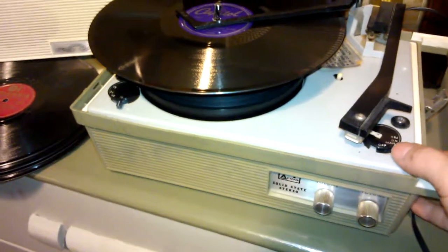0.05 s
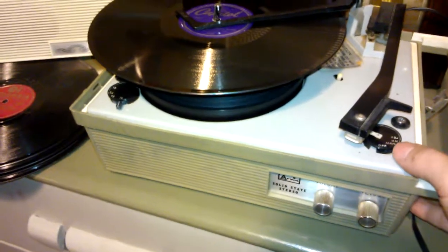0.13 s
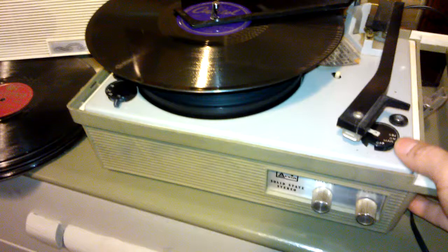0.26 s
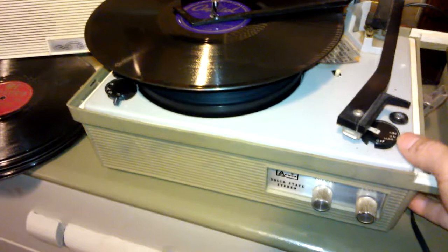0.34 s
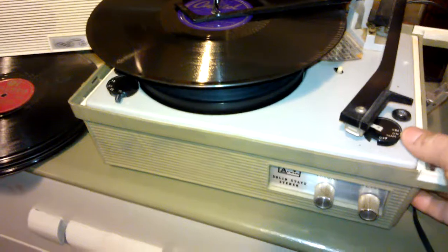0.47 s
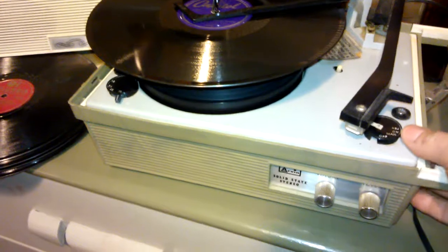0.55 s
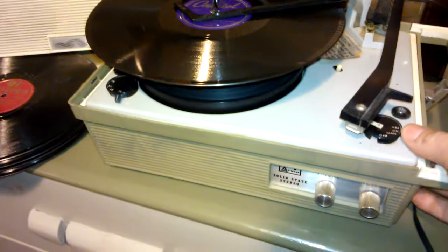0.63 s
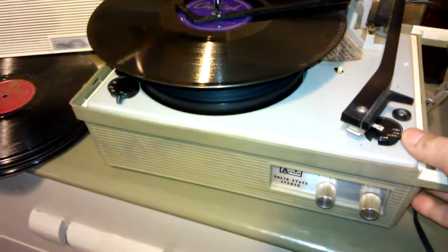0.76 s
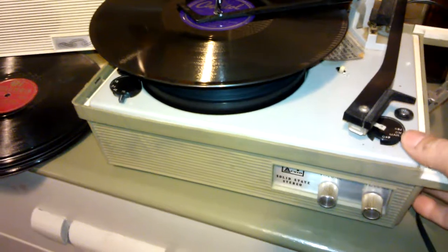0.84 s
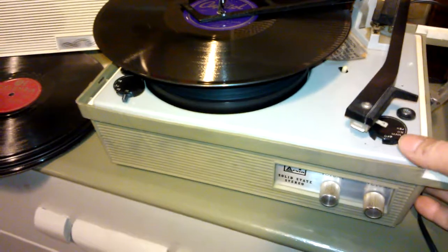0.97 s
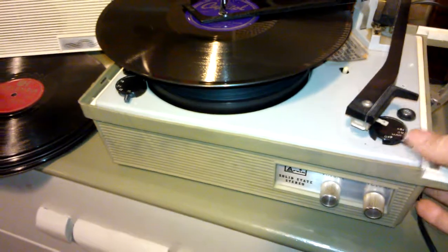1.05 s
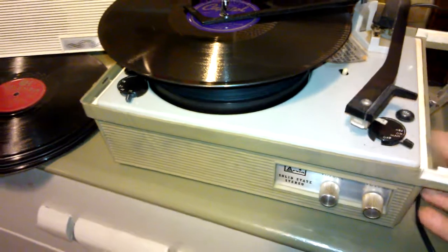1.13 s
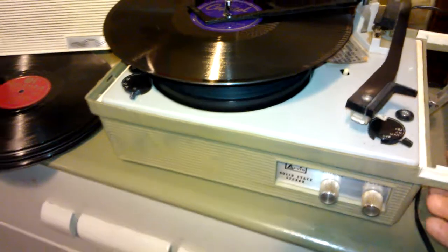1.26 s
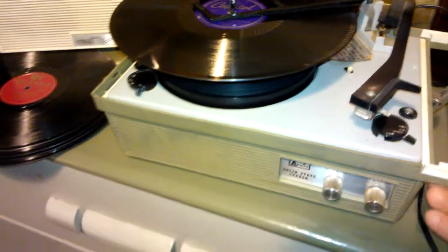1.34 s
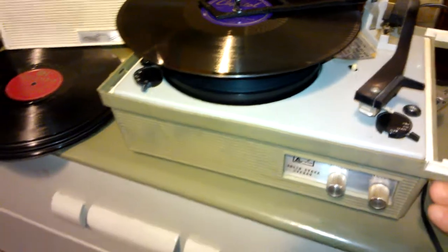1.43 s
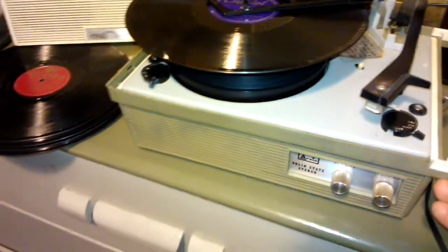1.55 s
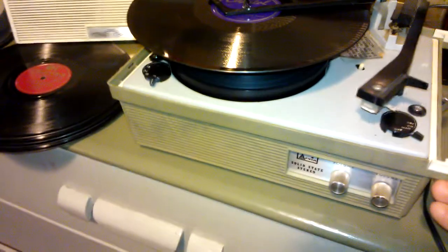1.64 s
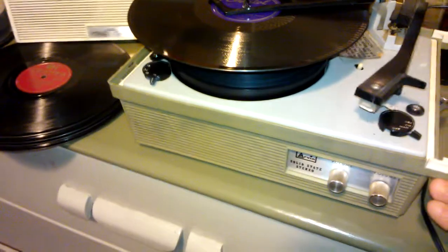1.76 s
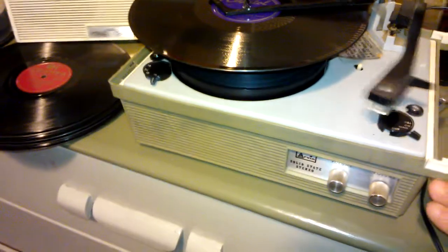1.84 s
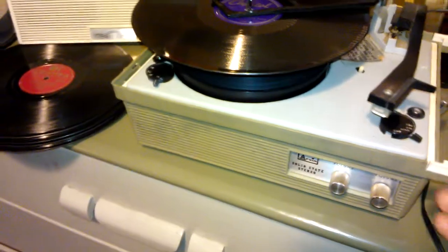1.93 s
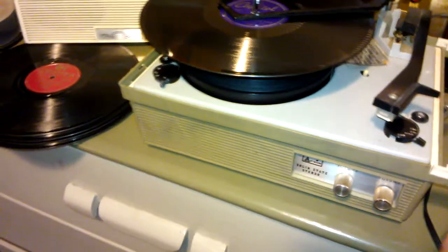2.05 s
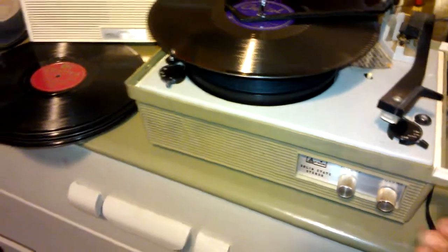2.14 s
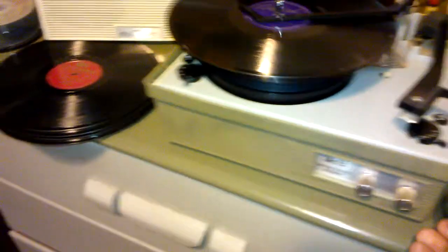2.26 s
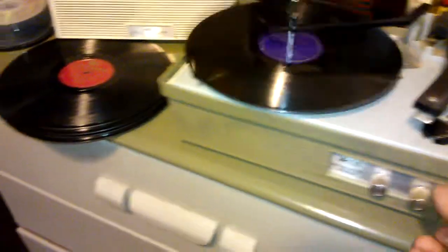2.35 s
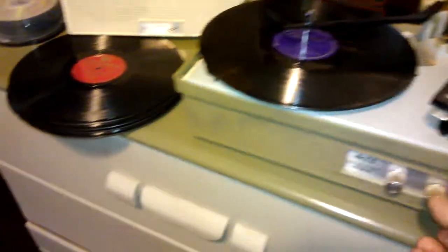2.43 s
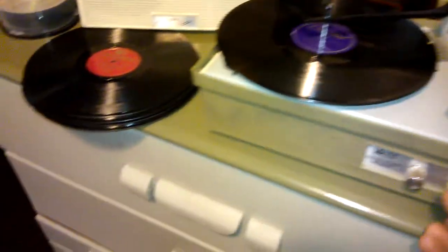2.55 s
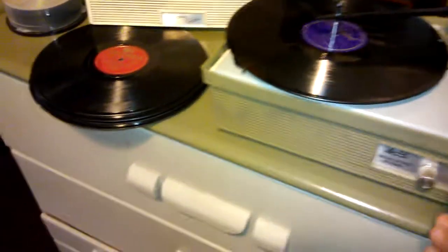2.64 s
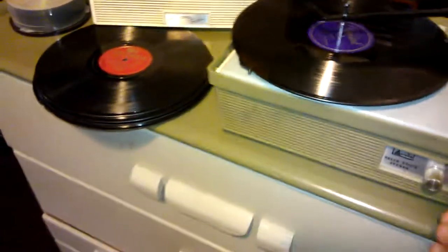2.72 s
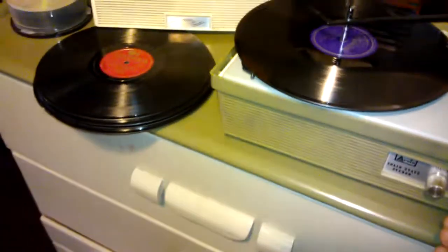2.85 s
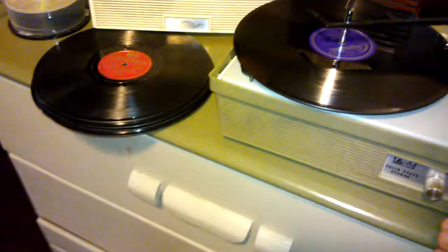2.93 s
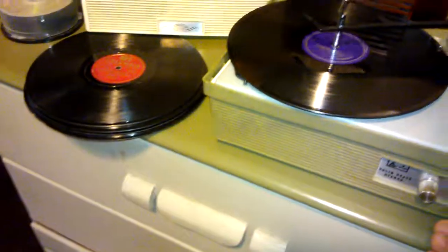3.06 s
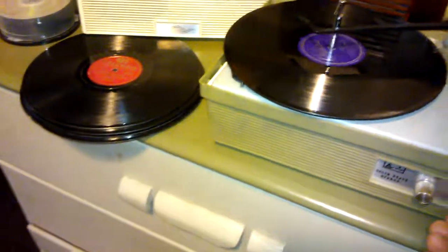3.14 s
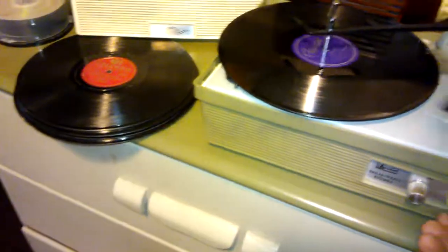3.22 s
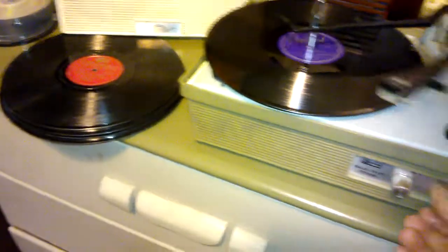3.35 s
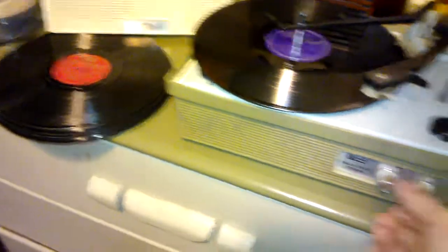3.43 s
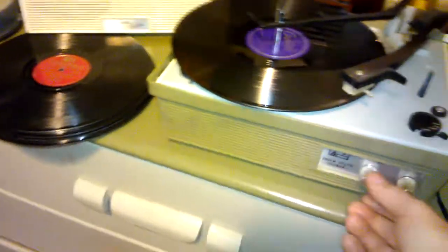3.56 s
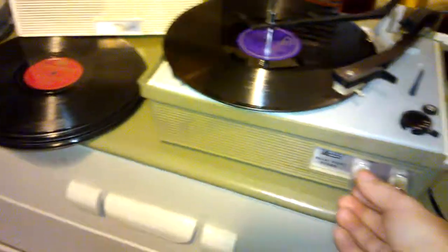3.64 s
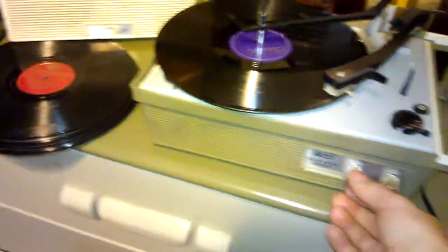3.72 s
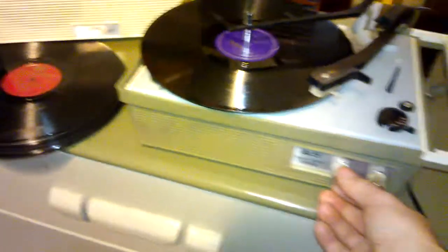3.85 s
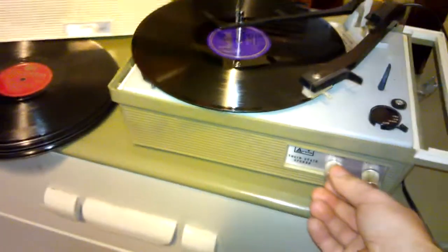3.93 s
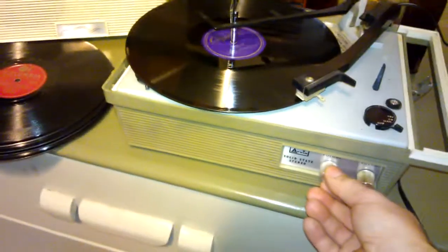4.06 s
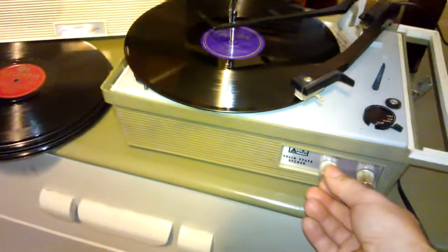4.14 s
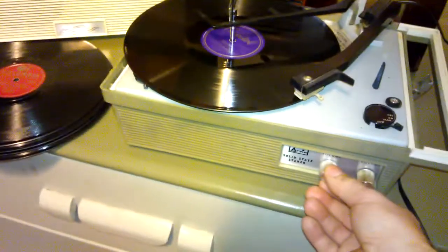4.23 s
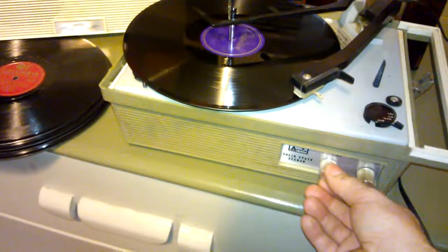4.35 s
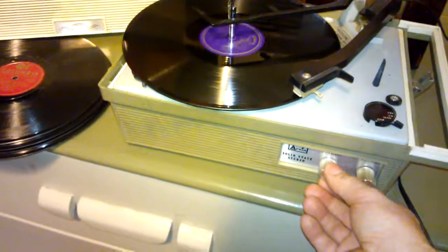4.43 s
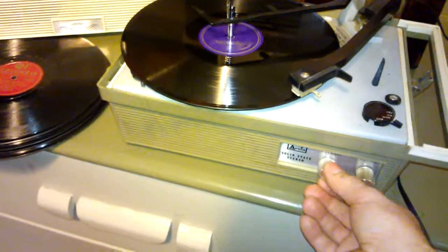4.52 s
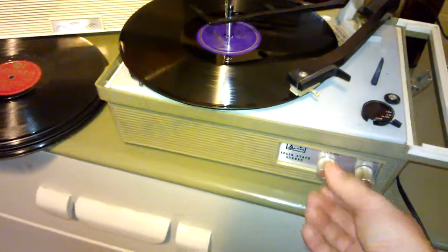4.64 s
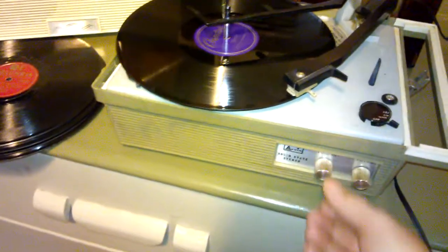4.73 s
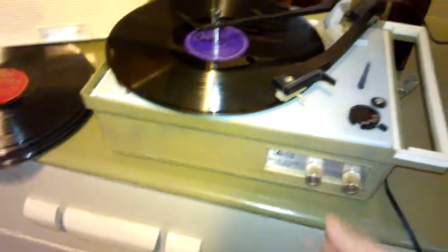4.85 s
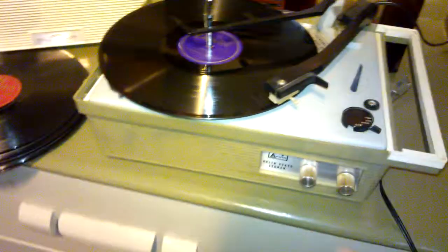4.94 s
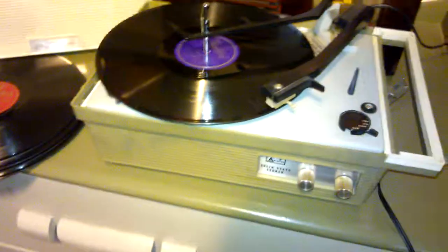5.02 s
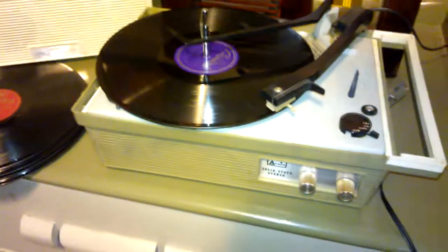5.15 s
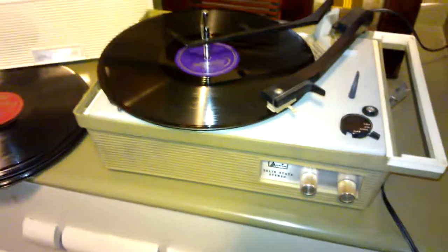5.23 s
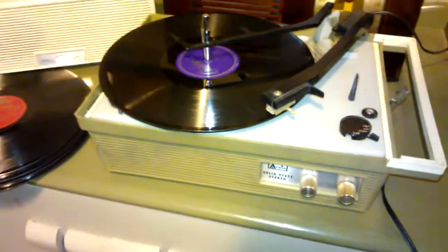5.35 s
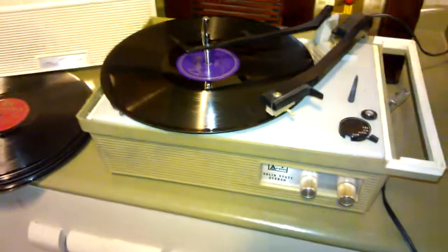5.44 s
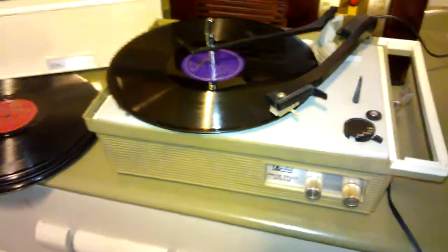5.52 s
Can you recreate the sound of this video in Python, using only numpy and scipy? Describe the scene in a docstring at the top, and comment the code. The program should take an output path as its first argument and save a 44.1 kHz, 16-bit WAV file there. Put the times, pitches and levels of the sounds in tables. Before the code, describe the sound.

A record changer ticks through its cycle, drops a record with a clunk and ends on a ringing clack over a low motor hum.

```python
"""A portable record changer runs through its cycle in a small room, over the hum of its motor.
First the selector is turned, levers tick and a gear grinds as it lifts the arm. At 2.2 s the
spindle latch snaps; a record drops, rocks the platter on its springs and swishes as it slips.
The arm swings in with more clicks, and at about 4 s the stylus lands and hisses in the groove.
Last, at 4.4 s, the mechanism lets go with a ringing clack."""
import sys
import numpy as np
from scipy import signal
from scipy.io import wavfile

SR = 44100
rng = np.random.default_rng(int(sys.argv[2]) if len(sys.argv) > 2 else 0)


def output_pcm(signal):
    """Save a mono or channel-first signal as 16-bit PCM at the path in sys.argv[1].

    Samples are clipped to [-1, 1] before scaling.
    """
    pcm = np.clip(np.atleast_2d(signal).T, -1, 1) * 32767
    wavfile.write(sys.argv[1], SR, np.round(pcm).astype(np.int16))


N = 246254
TIME = np.arange(N) / SR
BRIEF = TIME[:SR // 4]
HIT_SAMPLES = .03 * SR   # a hit has the energy of a steady noise this long at its level
# filters that split sound into bands a third of an octave wide
EDGES = 22 * 2 ** (np.arange(30) / 3)
CENTRES, WIDTHS = np.sqrt(EDGES[1:] * EDGES[:-1]), np.diff(EDGES)
BANK = [signal.butter(2, pair, "band", fs=SR, output="sos") for pair in zip(EDGES, EDGES[1:])]

# A "fade", or t60, is the time a sound takes to fall by 60 dB.
# the falling record's hits: (time [s], level [dB], treble fade [s])
DROP_HITS = [(2.3803, -29, 0.02), (2.400, -32, 0.056), (2.4382, -13.5, 0.047), (2.4469, -23.5, 0.047),
             (2.470, -37.5, 0.058)]
# the fallen record catches up with the platter: (time [s], share of full speed [0-1])
RECORD_SPEED = [(2.45, 0.6), (2.729, 0.49), (2.88, .74), (3.22, 1)]
# the case shifts under strain: (time [s], level [dB], length [s], pitch [Hz])
CASE_SHIFTS = [(0.771, -35.5, 0.0081, 405), (0.798, -47.5, 0.083, 381), (1.777, -55.5, 0.23, 154),
               (2.372, -34, 0.017, 352), (3.534, -40, 0.012, 366), (3.826, -36, 0.01, 345.3),
               (4.06, -46, 0.0478, 363), (4.164, -41.5, 0.036, 234.4), (4.69, -53.5, .03, 152.7)]


def record_drop():
    """The record hits the platter a few times in a row and sets it ringing."""
    # tone colour: (frequency [Hz], relative level [dB])
    colour = [(76, -15), (130, 3), (194, -8.5), (427, -0.5), (589, -27.5), (954, -0.5), (1240, -36.5),
              (1610, -9), (1780, -24), (2270, -5.5), (3260, -3), (5850, -17.5), (9870, -15), (16000, -31)]
    # broad resonances: (pitch [Hz], width [Hz], gain [dB])
    body = [(246, 180, -12.5), (2510, 250, -11), (3420, 390, -17)]
    # ringing tones: (pitch [Hz], relative level [dB], fade [s])
    tones = [(241, -2, 0.47), (306, -7, 0.23), (340.5, 6.5, 0.38), (386, -11, .22), (890, 14, 0.046),
             (1615, -11, 0.165), (2203, 4, 0.32), (2380, 5, 0.29), (2405, 4, 0.4), (2450, 10, 0.18),
             (2770, 0, 0.069), (3288, -10.5, .2), (3800, -5, 0.36), (4560, -1, .2), (6380, -7, .2)]
    cracks = blow(DROP_HITS, colour, body, bright_db=5.0, wet_db=-3.5)
    return cracks + ringing(DROP_HITS, tones, level_db=-31.5)


def release_clack():
    """The mechanism lets go, and its parts strike each other and ring."""
    # hits: (time [s], level [dB], treble fade [s])
    hits = [(4.4035, -34.5, 0.063), (4.4145, -34, 0.02), (4.4178, -13, 0.04), (4.440, -29, 0.14)]
    # tone colour: (frequency [Hz], relative level [dB])
    colour = [(59, -62), (100, -25.5), (166, -21.5), (302, -19), (365, -13), (570, -27.5), (1030, -17.5),
              (1170, -18.5), (1330, -14.5), (2170, -14.5), (2750, -8.5), (4020, -10.5), (7290, -20),
              (12900, -32.5), (16000, -49)]
    # broad resonances: (pitch [Hz], width [Hz], gain [dB])
    body = [(2708, 114, 14), (4640, 264, 1)]
    # ringing tones: (pitch [Hz], relative level [dB], fade [s])
    tones = [(1020, -2, 0.25), (1323, -2.5, 0.17), (2730, -20, 0.29), (2755, 4.5, 0.17),
             (2820, -10.5, 0.22), (3000, 1.5, 0.23), (2930, -9.5, 0.41), (3290, 3.5, 0.26), (4440, -8, .2),
             (4580, -6.5, 0.36), (5130, -9, 0.35), (6400, -24.5, .21), (6720, -19.5, .2), (7070, -15, 0.16),
             (8080, -7, .2)]
    return blow(hits, colour, body, bright_db=10.5, wet_db=-3.5) + ringing(hits, tones, level_db=-25.0)


def latch_snap():
    """The spindle latch snaps: four very quick hits and a faint ring."""
    # hits: (time [s], level [dB], treble fade [s])
    hits = [(2.2035, -46, 0.049), (2.2065, -24.5, 0.032), (2.2092, -20.5, 0.034), (2.2118, -22.5, 0.013)]
    # tone colour: (frequency [Hz], relative level [dB])
    colour = [(71, -61), (120, -7.5), (341, -4.5), (445, -7.5), (483, -5.5), (656, -19.5), (1010, -1.5),
              (1860, -11), (3450, 9.5), (5410, -6.5), (7820, -2), (15000, -6.5), (16000, -19)]
    # broad resonances: (pitch [Hz], width [Hz], gain [dB])
    body = [(796, 80, 2), (1033, 114, -3), (7460, 330, 0.5)]
    # ringing tones: (pitch [Hz], relative level [dB], fade [s])
    tones = [(964, 3.5, 0.36), (3330, -13, 0.38), (4060, -3.5, 0.26), (6940, -24, .3), (8100, -8, .21),
             (8480, -3.5, 0.23), (10030, -17.5, .2)]
    return blow(hits, colour, body, bright_db=4.5, wet_db=-3.0) + ringing(hits, tones, level_db=-42.5)


def spring_bounce():
    """The weight of the record rocks the deck on its springs."""
    # the rocking: (pitch [Hz], relative level [dB], fade [s])
    springs = [(29.5, -19, 0.76), (44, -26, 0.27), (74.6, -12.5, 0.22), (109, -47, 0.18)]
    return low_pass(ringing(DROP_HITS, springs, level_db=-2.5, lag_s=0.0088), hz=160)


def lever_clicks(level_db=-6, own_db=7, steel_db=-9, thud_t60=0.046, click_delay_s=.002):
    """Each lever click shakes the deck, small steel parts and a resonance of its own."""
    # levers, selector and arm:
    # (time [s], relative level [dB], brightness [dB per octave], own pitch [Hz], fade [s])
    clicks = [(0.21, -58, 0.5, 1530, 0.027), (0.411, -56.5, 2.5, 11000, .037),
              (0.458, -52, 5.5, 10800, 0.039), (0.496, -50.5, 4, 3390, .041),
              (0.538, -49.5, -1, 2880, 0.022), (0.581, -35, 1, 2450, 0.015), (0.717, -45.5, -2, 886, 0.059),
              (0.765, -48.5, -2.5, 860, 0.038), (0.809, -51.5, 3.5, 3730, 0.075),
              (0.871, -54, 1.5, 3540, 0.023), (1.0, -37, 4, 4240, 0.047), (1.577, -55.5, -3.5, 1150, 0.011),
              (1.647, -55, 1, 2970, 0.044), (1.939, -46, .5, 2970, 0.074), (2.038, -53, 0.5, 1170, .037),
              (3.21, -52.5, -1.5, 3240, 0.023), (3.35, -59, 7.5, 3530, 0.04),
              (3.46, -45.5, 1.5, 3400, 0.04), (3.517, -46, -0.5, 1680, 0.066),
              (3.803, -44, -2.5, 391, 0.047), (3.915, -67.5, 8.5, 4330, 0.026),
              (3.949, -58.5, 5, 8100, 0.085), (4.045, -44, 8.5, 3250, 0.045), (4.097, -51, -5, 3100, 0.1),
              (4.164, -51.5, -4.5, 850, 0.044), (4.223, -50.5, 3.5, 8600, .04),
              (5.29, -55.5, 0.5, 1910, 0.026)]
    # tone colour of all clicks: (frequency [Hz], relative level [dB])
    colour = [(60, -30), (200, -28.5), (350, -34), (600, -34.5), (1180, -30), (1800, -33), (3700, -31),
              (5800, -41.5), (9000, -37.5), (12000, -43.5), (15000, -55.5)]
    # steel parts: (pitch [Hz], relative level [dB], fade [s])
    steel_tones = [(1072, 5, 0.062), (1240, 8, .12), (2550, -4.5, 0.084), (3450, -1, .16), (3790, -9, .18),
                   (8950, -47, .1), (11100, -1, .09)]
    # resonances of deck and case: (pitch [Hz], width [Hz], gain [dB])
    deck = [(364.6, 29, 14), (1010, 77, 4.5), (2627, 84, 3), (3195, 200, -1.5), (7340, 140, -1.5),
            (8650, 290, -6.5)]
    out = np.zeros(N)
    octaves = lambda hz: np.log2(np.clip(hz, 400, 10800) / 2000)   # brightness tilts about 2000 Hz
    for s, db, tilt_db, own_hz, t60 in clicks:
        band_db = db + per_band(colour) + tilt_db * octaves(CENTRES)
        gains = from_db(band_db) * np.sqrt(WIDTHS * HIT_SAMPLES)
        fades = per_band([(300, thud_t60), (1000, t60)])
        wet_db = -3.5 + 1.3 * np.log2(t60 / thud_t60)   # shorter clicks get less room sound
        click = impact(gains, fades, wet_db)
        own_ring = from_db(own_db) * resonate(click * fade(BRIEF, t60=0.35), own_hz, own_hz / 16)
        steel = [(hz, db + steel_db + tone_db + tilt_db * octaves(hz), ring_s)
                 for hz, tone_db, ring_s in steel_tones]
        add(out, click + own_ring, s + click_delay_s)
        add(out, ring(steel), s + click_delay_s)
    return from_db(level_db) * (out + resonances(out, deck))


def case_booms(sharpness=3.6):
    """The case shifts and booms briefly, each time around one pitch."""
    white = rng.standard_normal(N)
    return sum(swell(s, db, length) * rms_one(resonate_twice(white, hz, hz / sharpness))
               for s, db, length, hz in CASE_SHIFTS)


def case_drone(hz=153.9, gain_db=-4.5, lag_s=0.028, spread_s=0.036):
    """Each shift wakes the lowest tone of the case, which comes later and lasts longer."""
    loudness = np.zeros(N)
    for s, db, length, _ in CASE_SHIFTS:
        longer = length + spread_s
        thinning_db = 10 * np.log10(length / longer)   # the energy is spread over more time
        loudness += swell(s + lag_s, db + gain_db + thinning_db, longer)
    return loudness * np.sin(2 * np.pi * hz * TIME + drift(5))


def record_swish(full_speed_hz=1930, width_hz=140, base_db=-63.5, slip_db=10.5):
    """The slipping record rubs unevenly; its two bands of noise rise and soften as it speeds up."""
    speed, landed = record_speed()
    centre_hz = full_speed_hz * speed * (1 + 0.12 * speed ** 2 * drift(16))
    upper = from_db(-6) * narrow_noise(1.5 * centre_hz, width_hz)
    since_caught_up = np.maximum(TIME - RECORD_SPEED[-1][0], 0)
    settle_db = np.exp(-since_caught_up / 0.14)   # 1 dB louder until the record settles
    uneven_db = 6.0 * speed * drift(22.17)
    level_db = base_db + slip_db * (1 - speed) + uneven_db + settle_db
    return landed * from_db(level_db) * (narrow_noise(centre_hz, width_hz) + upper)


def turning_rubs(turn_s=.168, brush_s=.018, base_db=-57.5, slip_db=13.5):
    """A small part brushes once a turn, slower and louder while the record still slips."""
    # resonances of the rub: (pitch [Hz], width [Hz], gain [dB])
    peaks = [(1540, 470, -7), (2140, 430, -18), (2880, 1000, -4.5)]
    speed, landed = record_speed()
    turns = np.cumsum(speed) / SR / turn_s
    turns -= np.interp(2.765, TIME, turns)   # one brush falls at 2.765 s
    brush = np.exp(-((turns - np.round(turns)) * turn_s / brush_s) ** 2)
    level_db = base_db + slip_db * (1 - speed) + drift(7.1)
    white = rng.standard_normal(N)
    chirp = sum(from_db(db) * resonate_twice(white, hz, width) for hz, width, db in peaks)
    return landed * brush * from_db(level_db) * rms_one(chirp)


def gear_grind(slips_per_s=700):
    """Tiny slips between gear teeth shake the linkage while the cam gear lifts the arm."""
    # loudness of the grinding: (time [s], level [dB])
    levels = [(0, -74), (.4, -64.5), (1.5, -61.5), (1.7, -61.5), (2.15, -57), (2.45, -53), (2.7, -94)]
    # resonances of the linkage: (pitch [Hz], width [Hz], gain [dB])
    linkage = [(850, 40, 4), (1170, 140, -13), (2543, 50, 2), (3260, 140, -0.5), (3730, 510, -6)]
    slips = (rng.random(N) < slips_per_s / SR) * rng.standard_normal(N)
    level_db = np.interp(TIME, *np.transpose(levels))
    return from_db(level_db) * rms_one(resonances(slips + 1e-18, linkage))


def stylus_hiss(lands_s=4.05, flicker_db=2.0):
    """The rough groove makes the stylus hiss in its own resonances, each one flickering."""
    # stylus resonances: (pitch [Hz], width [Hz], level [dB])
    peaks = [(6940, 600, -70.5), (8300, 790, -65), (9460, 510, -69), (10400, 350, -70), (11400, 680, -70),
             (12750, 800, -75)]
    groove = rng.standard_normal(N)
    hiss = sum(from_db(db + flicker_db * drift(42)) * rms_one(resonate_twice(groove, hz, width))
               for hz, width, db in peaks)
    return hiss * (TIME > lands_s)


def motor(whirr_db=-56.5, rumble_db=-54.5):
    """The motor hums, wavering a little, over the whirr and rumble of the drive."""
    # hum tones: (pitch [Hz], level [dB])
    hum_tones = [(59.2, -49.5), (118.4, -68), (156.1, -68), (236.9, -66), (349.9, -66), (893.6, -76)]
    # running mechanism and room: (frequency [Hz], relative level [dB])
    whirr_colour = [(88, -24), (150, 6), (190, -4.5), (235, 13.5), (259, -11.5), (341, 5), (545, -11),
                    (821, -7.5), (2400, -8.5), (2600, -16), (2760, -20), (3100, -11.5), (6020, -21),
                    (14500, -30.5), (16000, -37.5)]
    # rumble of the drive: (frequency [Hz], relative level [dB])
    rumble_colour = [(15, -10), (30, 0), (75, -7.5), (120, -19.5), (300, -37)]
    hum = np.zeros(N)
    for hz, db in hum_tones:
        peak = np.sqrt(2) * from_db(db - 0.5 * drift(7))
        phase = 2 * np.pi * (hz * TIME + rng.random()) + hz / 600 * drift(4)
        hum += peak * np.sin(phase)
    whirr = from_db(whirr_db - 2.5 * drift(17)) * noise(whirr_colour)
    return hum + whirr + from_db(rumble_db) * noise(rumble_colour)


def echoes(x):
    """The lid, worktop and walls each send back a quick, quiet copy."""
    # echoes: (delay [s], gain [dB])
    reflections = [(.0052, -22.5), (.0093, -17), (0.0153, -27), (0.0237, -21)]
    out = x.copy()
    for s, db in reflections:
        add(out, from_db(db) * x, s)
    return out


def blow(hits, colour, body, bright_db, wet_db):
    """A few quick hits, each a crack whose lows last longer, coloured by the struck part."""
    out = np.zeros(N)
    treble_lift = from_db(bright_db * np.log2(np.maximum(CENTRES / 4000, 1)))
    gains = unit(band_gains(colour) * treble_lift)
    for s, db, t60 in hits:
        crack = impact(gains, t60 * (1 + 400 / CENTRES), wet_db)
        add(out, from_db(db) * np.sqrt(HIT_SAMPLES) * crack, s)
    return out + resonances(out, body)


def impact(gains, t60, wet_db, gap_s=.004):
    """A short crack, then the room's tail, whose treble dies first; wet_db turns the tail up or down."""
    # length of the tail: (frequency [Hz], fade [s])
    room_fades = [(100, 0.49), (400, 0.35), (1500, 0.32), (3500, 0.33), (7500, 0.27), (11000, 0.3),
                  (16000, 0.158)]
    # strength of the tail: (frequency [Hz], relative level [dB])
    room_levels = [(100, -3.5), (400, 4.5), (1500, 3), (3500, -1), (7500, 1), (11000, -12), (16000, -40.5)]
    out = banded(gains, BRIEF, t60)
    tail_gains = gains * from_db(per_band(room_levels) + wet_db)
    add(out, banded(tail_gains, BRIEF, per_band(room_fades)), gap_s)
    return out


def ringing(hits, tones, level_db, lag_s=0):
    """The hardest hit of a blow sets the part ringing."""
    out = np.zeros(N)
    hardest_s = max(hits, key=lambda hit: hit[1])[0]
    add(out, from_db(level_db) * ring(tones), hardest_s + lag_s)
    return out


def ring(tones):
    """The fading pure tones of a struck part."""
    t = TIME[:SR]
    return sum(from_db(db) * fade(t, t60) * np.sin(2 * np.pi * hz * t) for hz, db, t60 in tones)


def record_speed():
    """The fallen record's share of full speed, and whether it has landed."""
    s, share = np.transpose(RECORD_SPEED)
    return np.interp(TIME, s, share), TIME > s[0]


def banded(gains, t, t60=np.inf):
    """Noise built band by band, each with its own strength and fade (steady by default)."""
    white = rng.standard_normal((2, len(t)))
    t60 = np.broadcast_to(t60, len(BANK))
    return sum(gain * unit(signal.sosfilt(BANK[k], white[k % 2] * fade(t, t60[k]) + 1e-18))
               for k, gain in enumerate(gains))


def noise(colour):
    """Steady noise with a given tone colour."""
    return rms_one(banded(band_gains(colour), TIME))


def narrow_noise(hz, width_hz):
    """A narrow band of noise that follows a moving pitch."""
    hiss = low_pass(rng.standard_normal((2, N)), width_hz)
    phase = 2 * np.pi * np.cumsum(hz) / SR
    return rms_one(hiss[0] * np.cos(phase) + hiss[1] * np.sin(phase))


def resonate(x, hz, width):
    """A resonance: it lets through the sound near one pitch."""
    r = np.exp(-np.pi * width / SR)
    feedback = [1, -2 * r * np.cos(2 * np.pi * hz / SR), r * r]
    return signal.lfilter(np.array([1, 0, -1]) * (1 - r * r) / 2, feedback, x)


def resonate_twice(x, hz, width):
    """A resonance with steeper sides."""
    return resonate(resonate(x, hz, width), hz, width)


def resonances(x, peaks):
    """Several resonances side by side."""
    return sum(from_db(db) * resonate(x, hz, width) for hz, width, db in peaks)


def low_pass(x, hz):
    """Soften everything above a frequency."""
    return signal.sosfilt(signal.butter(2, hz, fs=SR, output="sos"), x)


def band_gains(colour):
    """Turn a tone colour into band gains with a total energy of one."""
    return unit(from_db(per_band(colour)) * np.sqrt(WIDTHS))


def per_band(points):
    """Read a curve of (frequency [Hz], value) at each band's centre."""
    hz, value = np.transpose(points)
    return np.interp(np.log(CENTRES), np.log(hz), value)


def drift(rate_hz):
    """A slow random wander, about one in size."""
    knots = rng.standard_normal(512)
    return np.interp(TIME * rate_hz, np.arange(len(knots)), knots)


def swell(s, db, length):
    """A bell-shaped rise and fall of level."""
    return from_db(db) * np.exp(-((TIME - s) / length) ** 2)


def fade(t, t60):
    """A gain that falls by 60 dB every t60 seconds."""
    return from_db(-60 * t / t60)


def add(track, sound, s):
    """Mix a sound into a track at a time."""
    at = int(np.clip(round(s * SR), 0, len(track) - 1))
    track[at:at + len(sound)] += sound[:len(track) - at]


def from_db(db):
    """Decibels to gain."""
    return 10 ** (np.asarray(db) / 20)


def unit(x):
    """Scale to an energy of one."""
    return x / np.sqrt(np.sum(x ** 2) + 1e-20)


def rms_one(x):
    """Scale to an average (rms) level of one."""
    return unit(x) * np.sqrt(len(x))


def scene():
    """Three heavy blows and many clicks, over the running turntable."""
    blows = latch_snap() + record_drop() + release_clack()
    rubbing = case_booms() + turning_rubs() + record_swish() + gear_grind()
    mechanism = echoes(lever_clicks() + blows + rubbing)
    return (mechanism + spring_bounce() + case_drone() + motor() + stylus_hiss())[None]


def record(dry):
    """The highest peaks are rounded and the treble above 15900 Hz is cut."""
    treble_cut = signal.ellip(10, .1, 70, 15900, fs=SR, output="sos")
    return signal.sosfilt(treble_cut, np.tanh(dry))


dry = scene()
out = record(dry)
output_pcm(out)
```